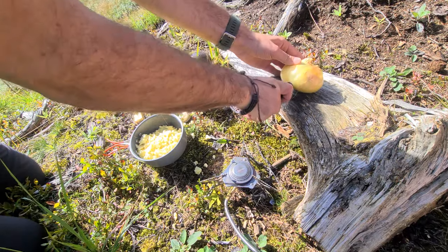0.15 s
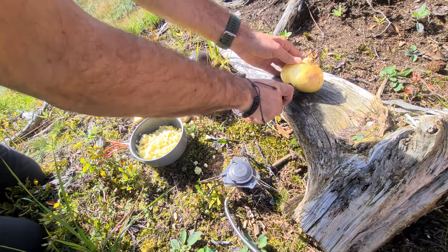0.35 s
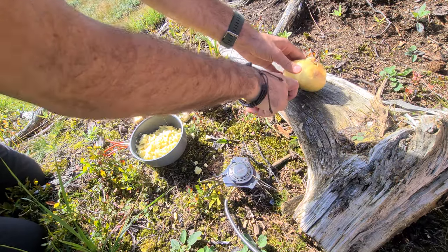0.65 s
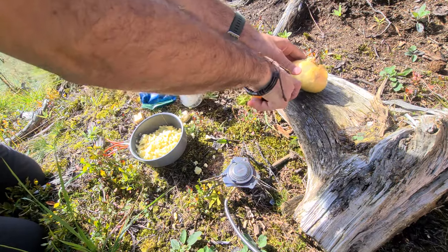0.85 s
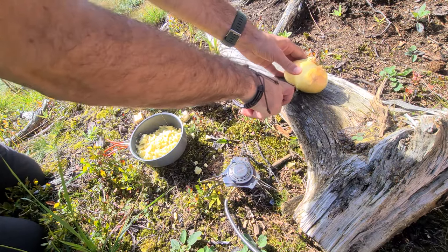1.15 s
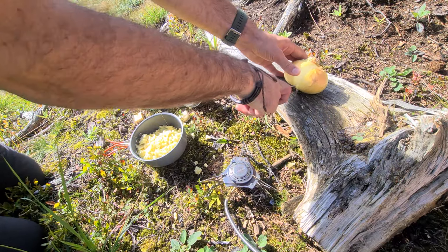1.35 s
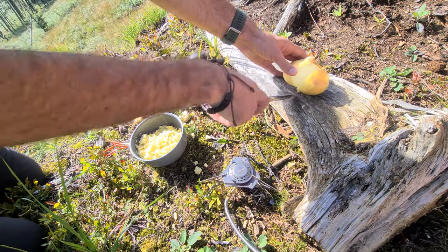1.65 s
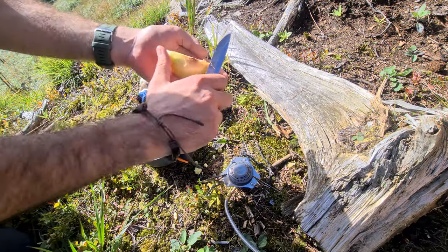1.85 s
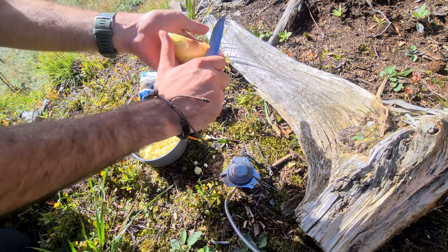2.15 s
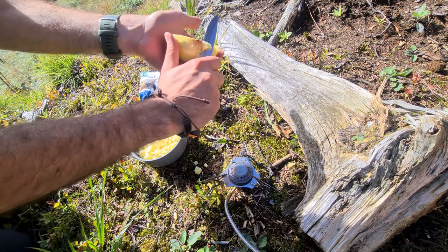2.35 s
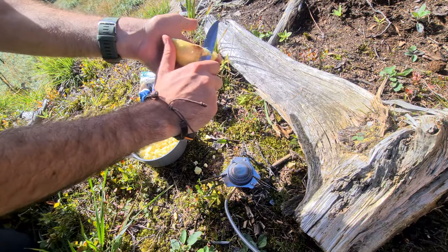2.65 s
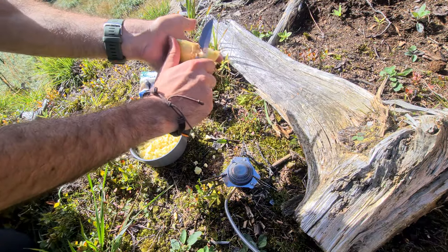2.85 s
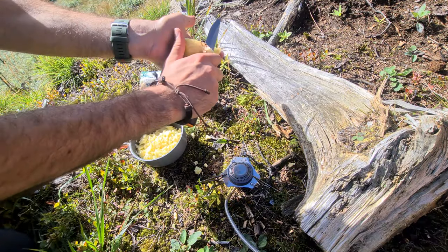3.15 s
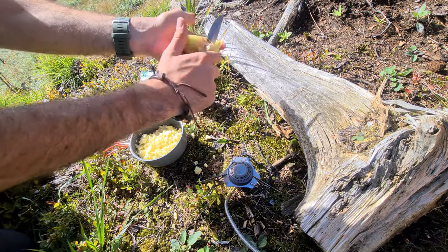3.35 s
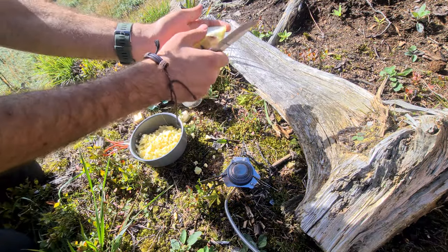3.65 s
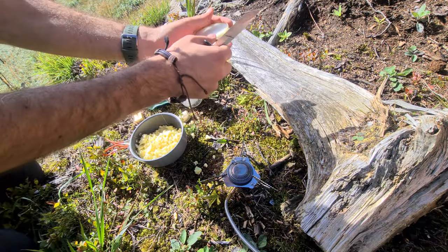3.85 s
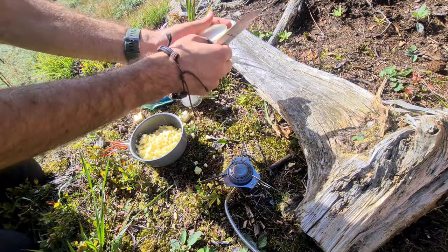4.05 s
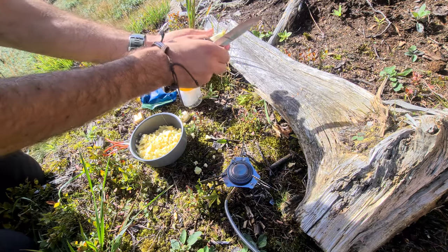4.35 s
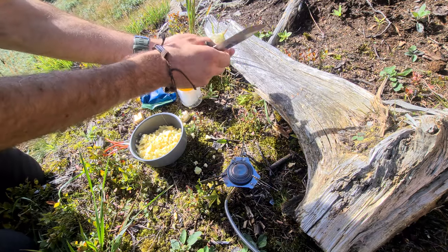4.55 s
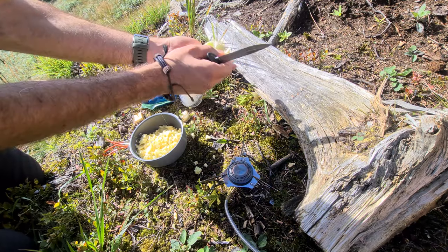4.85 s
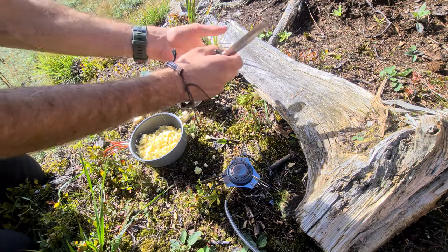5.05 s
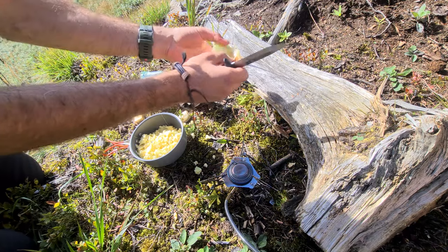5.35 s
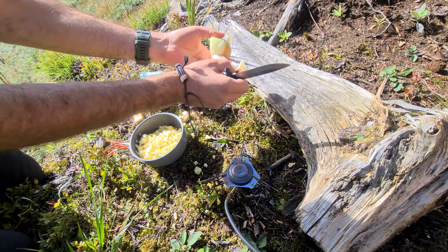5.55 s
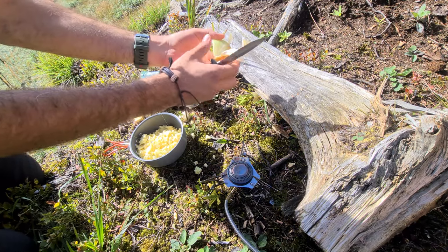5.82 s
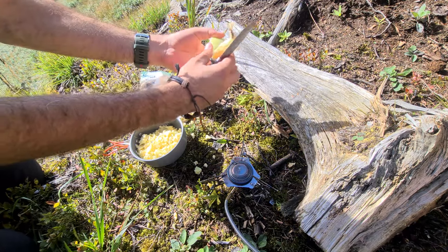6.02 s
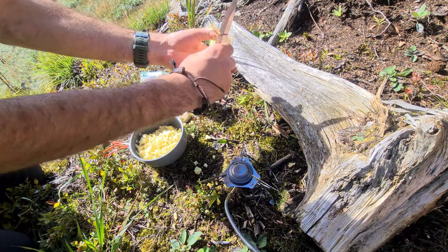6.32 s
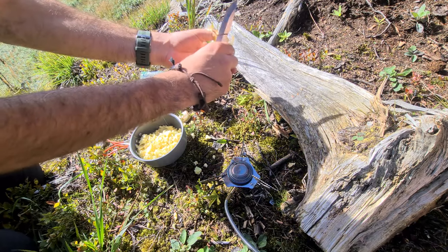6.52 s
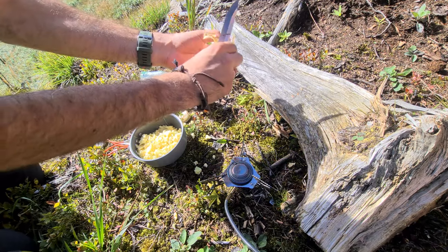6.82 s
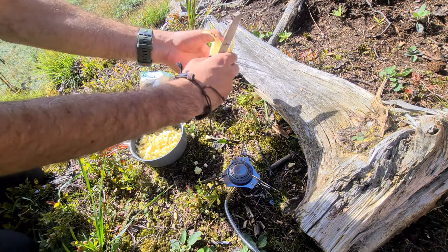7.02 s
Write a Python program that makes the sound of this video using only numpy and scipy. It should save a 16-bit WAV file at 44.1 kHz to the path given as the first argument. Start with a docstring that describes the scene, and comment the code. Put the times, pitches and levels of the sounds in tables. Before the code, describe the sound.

A small knife saws and cracks through an onion's dry end on a weathered stump, with sharp snaps, papery scrapes and short woody knocks. After a soft wet slide, the onion is lifted and its skin peeled in the hand, giving scattered brittle crackles and short tearing rustles. Close stereo microphone outdoors, very quiet air and slight wind puffs.

```python
"""A small knife trims an onion on a tree stump, then lifts and tears off its dry skin in the hand.
Trimming and tearing: bursts of breaking fibres, each coloured by the ringing flake and trailing splinters.
Strokes: dense dry grains on papery skin, smooth hiss in wet flesh. Knocks: the short modes of the stump.
Thuds: fingers landing on firm flesh. Hands, stump and ground close by scatter all of these.
Outdoors: a faint wash of air, arms moving close by, and late puffs of wind on the microphone's two ports."""
import sys
import numpy as np
from scipy import signal
from scipy.fft import rfft, irfft
from scipy.io import wavfile
from scipy.ndimage import uniform_filter1d

SR = 44100
rng = np.random.default_rng(int(sys.argv[2]) if len(sys.argv) > 2 else 0)


def digitize_waveform(pressure):
    """Quantize a signal to 16-bit integers and store it at the path in sys.argv[1].

    Rows of a 2-D input are taken as channels; values are limited to [-1, 1].
    """
    field = np.atleast_2d(pressure).T
    bounded = np.clip(field, -1, 1)
    quanta = np.round(bounded * 32767).astype(np.int16)
    wavfile.write(sys.argv[1], SR, quanta)


N = 316638

# air outdoors, colour: (frequency [Hz], relative level [dB])
AIR_COLOUR = [(30, -47), (134, -21.5), (374, -8.5), (937, -4), (1100, 4), (1630, -2.5), (5310, -5.5),
              (6050, -1.5), (8080, -26.5), (12600, -13), (16000, -15.5)]
# arm and clothing shifting near the microphone: (time [s], level before its unevenness [dB])
ARM_LEVELS = [(0, -77), (.35, -68), (1.28, -70), (1.72, -67), (1.88, -78), (6.2, -77), (6.55, -69.5),
              (6.9, -75)]
# rustling cloth, colour: (frequency [Hz], relative level [dB])
CLOTH_COLOUR = [(40, -44), (180, -23.5), (380, -1.5), (1100, -4), (2500, -9), (9000, -42)]
# puffs of wind on the microphone: (time of peak [s], build-up [s], let-go [s], level before lumps [dB])
WIND_PUFFS = [(5.75, 0.16, 0.16, -75), (5.9, 0.12, 0.1, -72), (7.05, 0.24, 0.25, -75)]
# wind buffeting the microphone, colour: (frequency [Hz], relative level [dB])
WIND_COLOUR = [(25, -30), (90, -3.5), (200, 1.5), (700, -3), (3000, -64)]
# the two microphone ports: (frequency [Hz], left minus right [dB])
PORT_DIFFERENCE = [(1290, 1.16), (4400, 2.5), (8120, -6.5), (15000, 0)]
# fingers bumping the onion: (time [s], peak level [dB])
FINGER_THUDS = [(5.7, -62), (5.888, -66.5), (5.911, -64), (6.504, -65.5), (7.021, -59), (7.106, -60)]
# blade bumping the stump through the onion: (time [s], peak level [dB], hardness [dB per octave])
BLADE_KNOCKS = [(0.2564, -30, 34), (0.2827, -29.5, 9.5), (0.8684, -27.5, 0), (1.126, -42.5, 7),
                (1.261, -51.5, 12)]
# the stump's modes: (frequency [Hz], relative level before hardness [dB], decay by 60 dB [s])
STUMP_MODES = [(274, -11, 0.03), (370, -2, 0.025), (483, -3.5, 0.021), (704, -5.5, 0.02), (843, 0.5, 0.02),
               (1164, -10, 0.012)]
# blade sliding through the onion on the stump: (time of greatest force [s], build-up [s], let-go [s],
# friction level [dB], dryness [0 wet flesh, 1 papery skin])
BLADE_STROKES = [(0.055, 0.26, 0.16, -44, 0.77), (0.166, 0.035, 0.055, -35, 0.9),
                 (0.222, 0.046, 0.058, -29, 0.67), (0.513, 0.077, 0.032, -56, 0.49),
                 (.685, 0.13, 0.21, -55.5, 0.63), (0.867, 0.038, 0.013, -32.5, 0.93),
                 (1.116, 0.071, 0.063, -40.5, 0.6), (1.572, 0.32, 0.1, -55, 0.039),
                 (1.721, 0.052, 0.029, -53.5, 0.08)]
# strips of skin pulled off in the hand: (time of greatest force [s], build-up and let-go [s],
# friction level [dB])
SKIN_PULLS = [(2.374, .018, -42), (2.42, .045, -46.5), (2.77, .07, -51.5), (2.955, .037, -43),
              (3.175, .085, -53.5), (3.55, .05, -53.5), (3.625, .035, -59), (3.84, .04, -59),
              (4.08, .1, -59), (4.55, .1, -60.5), (4.65, .04, -52), (5.375, .1, -47.5), (5.47, .031, -40),
              (5.545, .062, -40), (5.615, 0.039, -49), (5.72, .06, -56.5), (6.195, 0.054, -53.5),
              (6.325, .031, -56), (6.415, .05, -49.5), (6.555, .05, -56.5), (6.65, 0.095, -54.5),
              (6.818, 0.037, -51.5), (7.045, .09, -51), (7.155, .036, -48)]
# the layer of skin rubbed in the hand: (time [s], ring [Hz], dryness [0 wet flesh, 1 papery skin])
RUBBED_LAYER = [(2.301, 3520, 0.55), (3.2, 4430, 0.86), (3.65, 3000, 1), (4.049, 5540, 0.78),
                (4.47, 2276, 0.47), (4.62, 2430, 0.81), (5.45, 4400, 0.93), (6.799, 3510, 0.63)]
# rubbed or torn dry skin, colour: (frequency [Hz], relative level [dB])
SKIN_COLOUR = [(200, -44), (500, -19.5), (800, -19), (1250, -5.5), (1700, -7), (2500, -6), (3300, -3.5),
               (6200, -1.5), (8200, -7.5), (13000, -1), (16500, -13.5)]
# wet flesh, colour: (frequency [Hz], relative level [dB])
FLESH_COLOUR = [(100, -33.5), (400, -21), (1200, -1.5), (2300, 1), (3200, 5), (6000, 3.5), (8200, -20.5),
                (16000, -23)]
# skin and root snapping under the blade, colour: (frequency [Hz], relative level [dB])
SNAP_COLOUR = [(180, -38), (400, -16.5), (750, -16), (1200, 5.5), (1700, -1), (2400, 2), (3200, 7),
               (4500, 2), (6300, 5), (8000, -11), (13000, -10), (16500, -16)]
# the modes of a flake: (multiple of its ring frequency, share of the ring's dB)
FLAKE_SHAPES = [(1.001, 1.5), (1.452, 0.34), (2, .5)]
# the loudest breaks of dry skin in the hand: (time [s], snap level [dB],
# splintering relative to the snap, before a common offset [dB], ring of the flake [Hz])
LOUD_CRACKLES = [(2.001, -45, -28, 2490), (2.027, -40, -29.5, 3120), (2.1175, -41.5, -12.5, 1730),
                 (2.2138, -44, -26.5, 4360), (2.2412, -30.5, -14, 3590), (2.2884, -44, -13, 4240),
                 (2.3035, -37.5, -1.5, 3360), (2.3321, -41.5, -3, 3820), (2.362, -43.5, 7, 3460),
                 (2.3812, -35.5, -4.5, 2800), (2.4095, -41, -1, 1880), (2.447, -41, -6, 5780),
                 (2.6086, -45, -20, 3900), (2.7794, -31.5, -2, 3900), (2.7897, -26, -13, 4900),
                 (2.8264, -44, 2, 3580), (2.8544, -41, -5, 6100), (2.9091, -43.5, 4, 4800),
                 (2.9408, -51.5, 7.5, 1750), (2.9685, -39.5, 1.5, 6300), (3.1359, -43.5, -2.5, 4280),
                 (3.2238, -45.5, -4, 3020), (3.2422, -41.5, -20, 5100), (3.2889, -36, -8, 5340),
                 (3.3465, -36, -7, 4530), (3.4483, -46.5, -1, 4740), (3.6111, -54, 2, 2920),
                 (3.8104, -41.5, -11, 3000), (3.8325, -42.5, -17.5, 2980), (4.0103, -49, -17.5, 4700),
                 (4.0443, -46.5, -24, 5420), (4.099, -47, -1, 5480), (4.1848, -48, -12, 5830),
                 (4.4316, -53, -18, 2270), (4.5533, -49, -29.5, 2420), (4.8527, -48.5, -10, 6190),
                 (5.0674, -45.5, -4, 3710), (5.4436, -32, -3, 1230), (5.4731, -35, -12, 6370),
                 (5.4805, -34.5, -9, 5970), (5.5384, -30.5, -6, 4670), (5.6738, -51.5, 4, 1980),
                 (5.6924, -54, 5, 1560), (5.699, -39.5, -8, 1450), (6.1483, -45, -21, 4760),
                 (6.1812, -42.5, -19, 2800), (6.258, -48, -31, 3750), (6.2122, -35.5, -10, 6660),
                 (6.321, -42.5, -21, 4730), (6.3789, -39.5, -16, 5000), (6.4075, -37.5, -6.5, 3740),
                 (6.4149, -41, -28, 6200), (6.4262, -39, -12, 6270), (6.5175, -49, -3, 6460),
                 (6.5502, -39.5, -26, 3860), (6.6, -44.5, -23, 3120), (6.6339, -40.5, -26, 2720),
                 (6.6818, -40.5, -7.5, 2750), (6.9019, -41.5, -22, 6260), (6.9625, -44, -25, 5970),
                 (7.0064, -38.5, -6, 3910), (7.0428, -41.5, -4, 3770), (7.1413, -35.5, -20, 3610),
                 (7.1538, -32, -26, 6270), (7.1708, -32, -27, 5780)]
# blade cracking through skin and root on the stump: (time [s], snap level [dB],
# splintering relative to the snap, before a common offset [dB], ring [Hz],
# crispness before a common offset [dB])
BLADE_CUTS = [(0.0712, -29.5, -3, 3770, -3), (0.2015, -21, -2, 5000, -19), (0.2558, -15.5, -24, 3340, -16),
              (0.2839, -12, -39, 2760, -10), (0.6104, -35.5, 1, 2560, -13),
              (0.8355, -36.5, -16.5, 3900, -9), (0.8508, -10.5, -8.5, 3400, -27),
              (0.8568, -18, 0, 3100, -9.5), (0.8647, -17, -7.5, 4400, -5),
              (0.8687, -13.5, -13.5, 3300, -19), (1.0051, -42.5, -8, 2480, -9),
              (1.0272, -41.5, -18, 4100, -6), (1.0618, -34, 0, 3900, -15), (1.075, -19.5, -26.5, 3950, -14),
              (1.0999, -24, -2, 3020, -10.5), (1.1253, -22.5, -7, 5030, 0), (1.1386, -31, 1, 3380, -20)]

AIR_DB = -70.5
HOLD_DB = -75  # friction of fingers that merely hold the onion
LIFT_S = 1.9  # the onion leaves the stump for the hand
STUMP_LAG, HAND_LAG = 10, 2  # samples by which the left port hears later
SLICE_RING_HZ, RING_OCTAVES = 3900, .3  # ring of the skin under the blade; width of any rubbed ring
# a stroke falls by STROKE_DB over its build-up and let-go times; STROKE_ARCH rounds its top
STROKE_DB, STROKE_ARCH = 16, 1.5
EDGE_HZ = 16300  # upper band limit


def amp(db):
    """Decibels to gain."""
    return 10 ** (np.asarray(db) / 20)


def unit(x):
    """Scales to rms 1."""
    return x / np.sqrt(np.mean(x ** 2) + 1e-20)


def spectrum(points, hz):
    """Reads (frequency [Hz], value) points on a log-frequency axis."""
    f, value = np.transpose(points)
    return np.interp(np.log(hz + 1), np.log(f), value)


def curve(rows, t):
    """Reads (time [s], value) points at the times t."""
    return np.interp(t, *np.transpose(rows))


def add(mix, s, sound):
    """Mixes a stereo sound in at s seconds."""
    part = mix[:, max(round(s * SR), 0):][:, :sound.shape[1]]
    part += sound[:, :part.shape[1]]


def bump(hz, centre_hz, octaves):
    """A broad resonance of height 1."""
    return np.exp(-.5 * (np.log2((hz + 1) / centre_hz) / octaves) ** 2)


def causal(db):
    """Minimum-phase click with the given spectrum."""
    log_gain = np.log(amp(np.r_[db, db[-2:0:-1]]))
    return np.fft.ifft(np.exp(np.conj(signal.hilbert(log_gain)))).real


def blend(z, share):
    """Two port signals from three noises; share is the part of the power common to both."""
    share = np.clip(share, 0, 1)
    return np.sqrt(share) * z[2] + np.sqrt(1 - share) * z[:2]


def smooth_noise(*sizes):
    """Slow random wander of rms 1, from noise averaged over each size [samples] in turn."""
    wander = rng.standard_normal(N)
    for size in sizes:
        wander = uniform_filter1d(wander, size=size)
    return unit(wander)


def noise(points, likeness):
    """Stereo noise of one colour, partly shared by the ports."""
    z = blend(rng.standard_normal((3, N)), likeness)
    return unit(irfft(rfft(z) * amp(spectrum(points, np.fft.rfftfreq(N, 1 / SR))), N))


def swells(rows, t):
    """Level in dB of each stroke or puff: it builds up, then lets go, equally fast if given one length."""
    s, *lengths_s, db = np.array(rows)[:, :4].T[:, :, None]
    away = np.maximum((s - t) / lengths_s[0], (t - s) / lengths_s[-1])
    return db - STROKE_DB * abs(away) ** STROKE_ARCH


def outdoors(lumpy_db=3):
    """Steady air, the rustle of moving arms close by, and lumpy puffs of wind on the microphone."""
    t = np.arange(N) / SR
    lumps = smooth_noise(1200, 500)
    arms = noise(CLOTH_COLOUR, 0.083) * amp(curve(ARM_LEVELS, t) + 2.8 * lumps[::-1])
    wind = noise(WIND_COLOUR, 0.11) * amp(swells(WIND_PUFFS, t).max(0) + lumpy_db * lumps)
    return amp(AIR_DB) * noise(AIR_COLOUR, 0.066) + arms + wind


def surroundings(x, near_db=-13, near_t60=0.018, far_db=-30, far_t60=0.079):
    """Hands, stump and ground scatter the sound quickly; a faint tail follows."""
    t = np.arange(SR // 3) / SR
    shape = (2, 2, len(t))
    taps = rng.standard_normal(shape) * (rng.random(shape) < .1) * (t > .001)
    near = taps[0] * amp(-60 * t / near_t60)
    # the tail is duller than the near scatter
    far = signal.lfilter([1, 1], [1, -.3], taps[1]) * amp(-60 * t / far_t60)
    echo = (amp(near_db) * unit(near) + amp(far_db) * unit(far)) / np.sqrt(len(t))
    return x + signal.fftconvolve(x, echo, axes=1)[:, :N]


def thuds(body_hz=220, octaves=0.67, die_s=0.0028):
    """The firm flesh gives a small dull thud when a finger lands on it."""
    out, t = np.zeros((2, N)), np.arange(4096) / SR
    resonance = bump(np.fft.rfftfreq(2048, 1 / SR), body_hz, octaves)
    body = causal(20 * np.log10(resonance + 1e-3))
    for s, db in FINGER_THUDS:
        contact = rng.standard_normal(len(t)) * np.exp(-t / die_s)
        thud = signal.fftconvolve(contact, body)
        add(out, s, amp(db) * np.array([thud, thud]) / abs(thud).max())
    return out


def knocks(lowest_hz=240):
    """Short, dull modes of weathered wood, with little bass; a harder contact favours the upper modes."""
    out, t = np.zeros((2, N)), np.arange(4096) / SR
    bass_cut = signal.butter(4, lowest_hz, "high", fs=SR, output="sos")
    for s, db, hardness in BLADE_KNOCKS:
        ring = np.zeros(len(t))
        for k, (hz, mode_db, t60) in enumerate(STUMP_MODES):
            level_db = mode_db + hardness * np.log2(hz / lowest_hz) - 60 * t / t60
            ring += (-1) ** k * amp(level_db) * np.sin(2 * np.pi * hz * t)
        ring = signal.sosfilt(bass_cut, ring)
        add(out, s, amp(db) * np.array([np.roll(ring, STUMP_LAG), ring]) / abs(ring).max())
    return out


def handling(t):
    """Friction dB, ring Hz and dryness: strong blade strokes weigh most, then the layer in the hand."""
    steps = np.arange(0, N / SR, .002)
    on_stump = steps < LIFT_S
    slices = swells(BLADE_STROKES, steps)
    levels = np.vstack([slices, swells(SKIN_PULLS, steps)])
    weight = amp(slices - slices.max(0))
    blade_dryness = np.array(BLADE_STROKES)[:, -1] @ weight / weight.sum(0)
    s, layer_hz, layer_dryness = np.transpose(RUBBED_LAYER)
    dryness = np.where(on_stump, blade_dryness, np.interp(steps, s, layer_dryness))
    ring_hz = np.where(on_stump, SLICE_RING_HZ, np.interp(steps, s, layer_hz))
    work_db = 10 * np.log10((amp(levels) ** 2).sum(0) + amp(HOLD_DB) ** 2)
    return [np.interp(t, steps, control) for control in (work_db, ring_hz, np.clip(dryness, 0, 1))]


def friction_grains(t, work_db, dry, grains_per_s=3000, spread_db=3.5, blade_spread_db=3.5):
    """Dry skin gives in separate grains, crowded by pressure; wet flesh adds smooth noise."""
    # grains_per_s holds at a friction level of -45.5 dB
    chance = np.minimum(grains_per_s * amp(0.9 * (work_db + 45.5)) / SR, .5)
    luck = np.minimum(rng.exponential(1, N), 4)
    sizes = np.where(t < LIFT_S, unit(amp(blade_spread_db * luck)), unit(amp(spread_db * luck)))
    sizes = sizes * (rng.random(N) < chance) / np.sqrt(chance)
    # each grain is a burst about half a millisecond long
    burst = signal.windows.hann(25)
    bursts = np.convolve(sizes ** 2, burst / burst.sum(), "same")
    return rng.standard_normal((3, N)) * np.sqrt(bursts * dry + (1 - dry) ** 2)


def friction_colour(hz, times, ring_db=8, patchy_db=3.0, wood_db=4.5, wood_hz=900):
    """Colour in dB of the rubbed surface: skin or duller flesh, ringing flakes, wood below the blade."""
    force_db, ring_hz, dryness = handling(times)
    colour = dryness * spectrum(SKIN_COLOUR, hz) + (1 - dryness) * spectrum(FLESH_COLOUR, hz)
    # the wood underneath gives the scrape some body
    colour += wood_db * (times < LIFT_S) * dryness * bump(hz, wood_hz, 0.83)
    # from one flake to the next the ring shifts and the treble comes and goes
    pitch, sheen = unit(uniform_filter1d(rng.standard_normal((2, len(times))), size=5, axis=1))
    # under a light touch one flake rings alone; under pressure many rings blur together
    alone = np.interp(force_db, [-58, -46], [1, .35]) * np.sqrt(dryness)
    colour += ring_db * alone * bump(hz, ring_hz * 2 ** (.1 * pitch), RING_OCTAVES)
    colour += sheen * dryness / (1 + np.exp((7200 - hz) / 1000))
    patches = uniform_filter1d(rng.standard_normal(colour.shape), size=6, axis=0)
    patches = uniform_filter1d(patches, size=10, axis=1)
    return colour + patchy_db * unit(patches)


def friction(flutter_db=2.5, likeness=0.18, stump_likeness=0.89, alike_below_hz=5000,
             stump_lag_s=0.00024):
    """Blade and fingers rub the onion: grainy scrapes on dry skin, a smooth, duller hiss on wet flesh."""
    t = np.arange(N) / SR
    work_db, _, dry = handling(t)
    grains = friction_grains(t, work_db, dry)
    hz, times, z = signal.stft(grains, SR, nperseg=256, noverlap=192)
    hz, on_stump = hz[:, None], times < LIFT_S
    # the blade on the stump is a point source that reaches the right port first, which sounds hollow;
    # the hand reaches both nearly together
    share = np.where(on_stump, stump_likeness / (1 + (hz / alike_below_hz) ** 6), likeness)
    late = np.exp(-2j * np.pi * hz * np.where(on_stump, stump_lag_s, HAND_LAG / SR))
    z = np.sqrt(share) * np.array([z[2] * late, z[2]]) + np.sqrt(1 - share) * z[:2]
    gain = amp(friction_colour(hz, times))
    z = z * gain / np.sqrt(np.mean(gain ** 2, axis=0))
    scrape = signal.istft(z, SR, nperseg=256, noverlap=192)[1][:, :N]
    # dry skin catches and slips
    slips = smooth_noise(260, 80)
    return scrape * amp(work_db + flutter_db * dry * slips)


def fractures(rows, body, lag, clump_s, clump_db, lead_s, lead_db, splinter_s, splinter_db,
              ring_db, ring_octaves, wander_db, crisp_db, likeness):
    """Fibres start to give, then break in a tight clump, followed by a dying run of splinters."""
    out, size, start = np.zeros((2, N)), 2400, 352
    t, hz = (np.arange(size) - start) / SR, np.fft.rfftfreq(512, 1 / SR)
    snap_s, run_s = .0015, .008  # lengths over which the two levels count
    treble = 1 / (1 + np.exp((7200 - hz) / 500))
    for s, db, after_db, ring_hz, crisp in rows:
        # every flake of skin has its own size, and so its own colour
        modes = [height * bump(hz, ring_hz * k, ring_octaves) for k, height in FLAKE_SHAPES]
        wander = unit(uniform_filter1d(rng.standard_normal(len(hz)), size=4))
        wander = wander * np.minimum(hz / 2500, 1) ** 2
        colour = spectrum(body, hz) + ring_db * np.max(modes, axis=0) + wander_db * wander
        # crispness sets the treble, whatever the colour had of it
        natural_db = 10 * np.log10(np.average(treble, weights=amp(colour) ** 2))
        colour = colour + treble * (crisp + crisp_db - natural_db)
        # the main break is larger, and so duller, than its splinters
        crack, splinter = causal(colour - 4 * treble), causal(colour + 4.6 * treble)
        fibres = rng.standard_normal((3, size)) * rng.exponential(1, size) * (rng.random(size) < .15)
        fibres = blend(fibres, likeness)
        lead = fibres * np.exp(-abs(t) / lead_s) * (t < 0)
        clump = unit(fibres * np.exp(-abs(t) / clump_s * np.where(t < 0, 2, 1)))
        head = amp(clump_db) * clump + unit(1. * (t == 0))
        run = fibres[:, ::-1] * np.clip(t / snap_s, 0, 1) * np.exp(-abs(t) / splinter_s)
        lead = unit(signal.fftconvolve(lead, splinter[None], axes=1))
        run = unit(signal.fftconvolve(run, splinter[None], axes=1))
        head = unit(signal.fftconvolve(head, crack[None], axes=1))
        # a break that splinters strongly also builds up strongly
        loose = (run + amp(lead_db) * lead) * amp(after_db + splinter_db)
        sound = head * np.sqrt(snap_s) + loose * np.sqrt(run_s)
        add(out, s + t[0], amp(db) * sound * np.sqrt(SR / sound.shape[1]))
    return np.array([np.roll(out[0], lag), out[1]])


def small_crackles(count=115, level_db=-56.0, spread_db=1.0, after_db=-18, crowding=0.29, growth=0.24,
                   ring_hz=4600, ring_octaves=.45):
    """Small flakes of many sizes break at random in the hand, more often and louder under a hard pull."""
    t = np.arange(LIFT_S, N / SR, .002)
    work_db = handling(t)[0]
    chance = np.cumsum(amp(crowding * work_db))
    s = np.interp((np.arange(count) + rng.random(count)) / count, chance / chance[-1], t)
    strength, size = rng.standard_normal((count, 2)).T
    db = level_db + growth * (np.interp(s, t, work_db) - work_db.mean()) + spread_db * strength
    return np.c_[s, db, np.full(count, after_db), ring_hz * 2 ** (ring_octaves * size)]


def peeling():
    """Dry skin tears in the hand: loud and small flakes break and ring, nearly alone in each port."""
    breaks = np.vstack([LOUD_CRACKLES, small_crackles()])
    # the fainter the break, the more of it lies in the treble
    crispness = -.24 * (breaks[:, 1] - np.mean(LOUD_CRACKLES, axis=0)[1])
    return fractures(np.c_[breaks, crispness], SKIN_COLOUR, HAND_LAG, clump_s=0.00086, clump_db=0.0,
                     lead_s=0.0041, lead_db=-9, splinter_s=0.0056, splinter_db=-2.0, ring_db=7.5,
                     ring_octaves=0.16, wander_db=3.0, crisp_db=-9, likeness=0.09)


def trimming():
    """The blade cracks skin and root on the stump: tight snaps, reaching the right port first."""
    return fractures(BLADE_CUTS, SNAP_COLOUR, STUMP_LAG, clump_s=0.00055, clump_db=-9,
                     lead_s=0.0011, lead_db=-9.5, splinter_s=0.0054, splinter_db=-9.5, ring_db=5.5,
                     ring_octaves=0.24, wander_db=2.0, crisp_db=-2.0, likeness=0.4)


def scene():
    """Trimming on the stump, then peeling in the hand, close to the microphone outdoors."""
    close = thuds() + knocks() + friction() + peeling() + trimming()
    return outdoors() + surroundings(close)


def record(dry):
    """Each microphone port has its own colour; then the band limit."""
    tilt_db = spectrum(PORT_DIFFERENCE, np.fft.rfftfreq(N, 1 / SR))
    heard = irfft(rfft(dry) * amp(np.array([tilt_db, -tilt_db]) / 2), N)
    band_limit = signal.firwin(401, EDGE_HZ, window=("kaiser", 8), fs=SR)
    return signal.oaconvolve(heard, band_limit[None], "same")


dry = scene()
out = record(dry)
digitize_waveform(out)
```